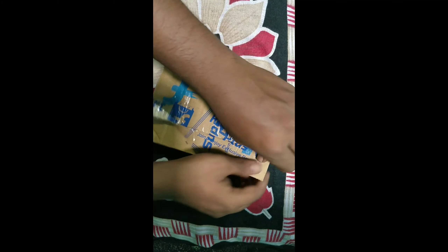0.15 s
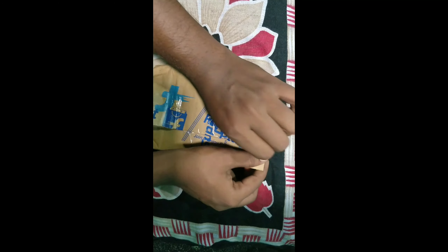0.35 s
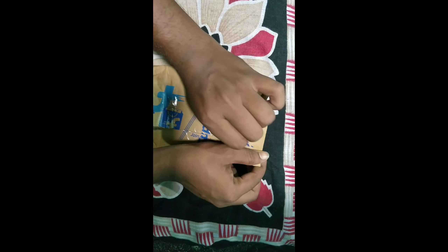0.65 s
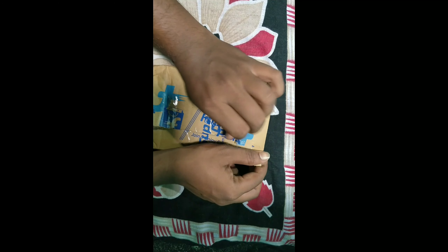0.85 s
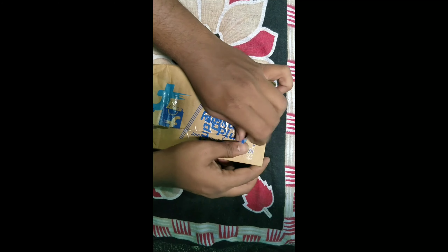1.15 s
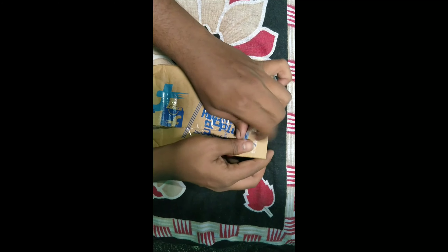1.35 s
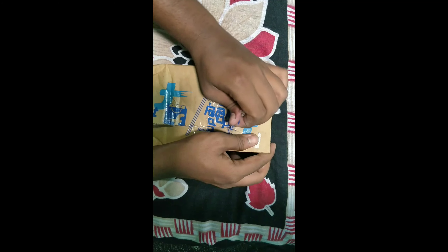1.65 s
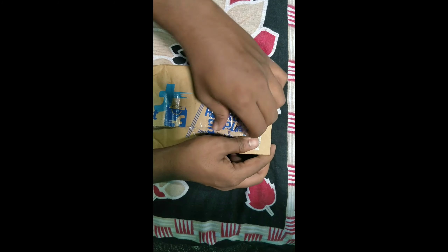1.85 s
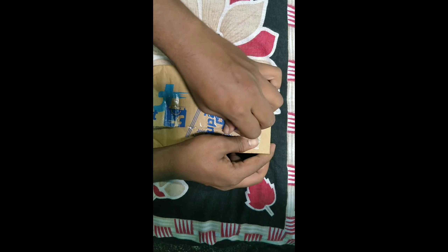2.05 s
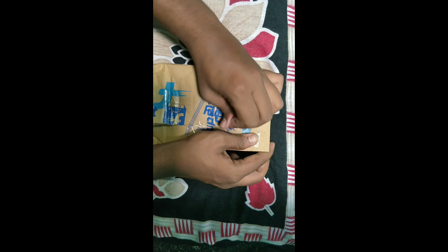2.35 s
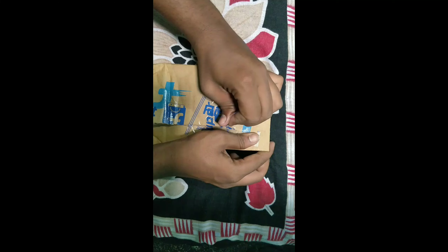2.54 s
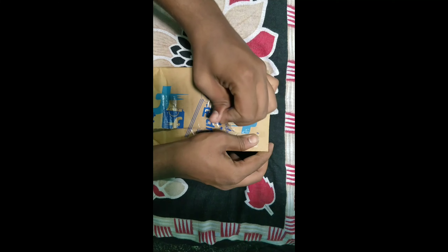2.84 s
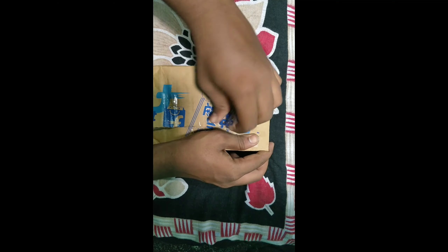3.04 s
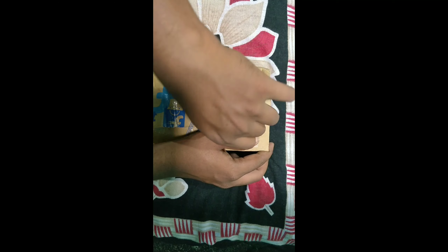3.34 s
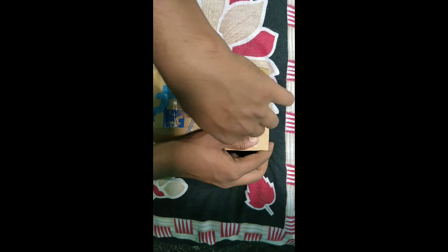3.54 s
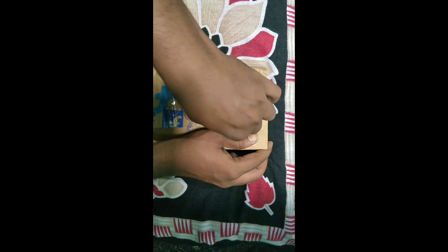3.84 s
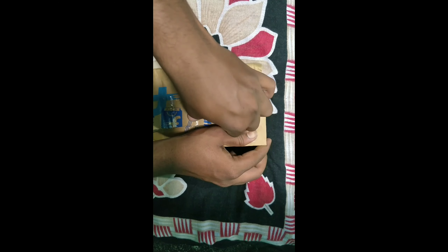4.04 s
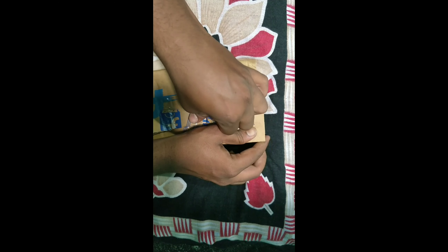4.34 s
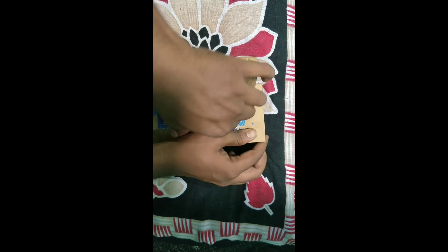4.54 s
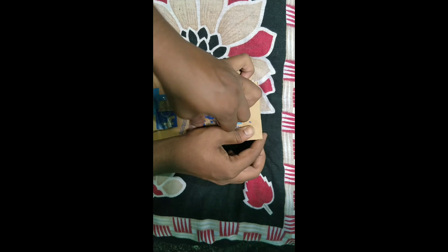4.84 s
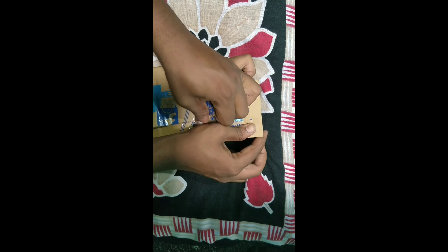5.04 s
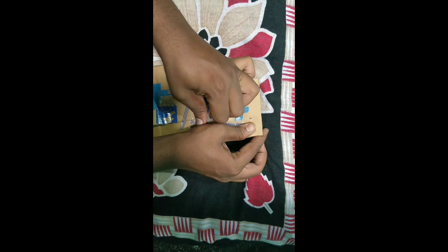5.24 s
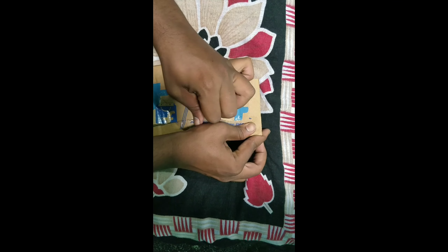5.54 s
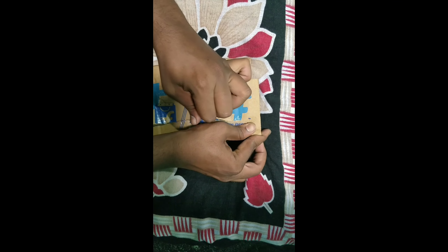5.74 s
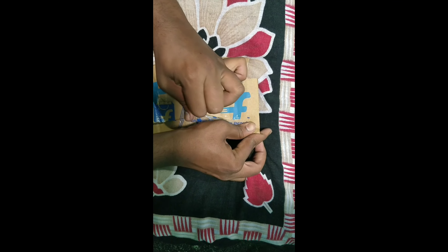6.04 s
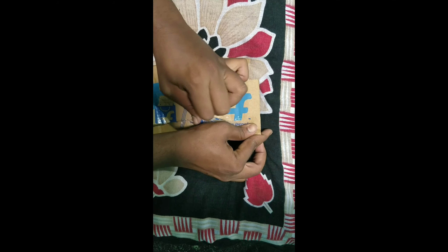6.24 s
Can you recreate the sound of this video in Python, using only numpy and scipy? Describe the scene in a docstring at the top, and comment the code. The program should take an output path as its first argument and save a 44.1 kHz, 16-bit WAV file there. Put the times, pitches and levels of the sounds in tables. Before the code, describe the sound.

Close up in a small room, tape is plucked and peeled from cardboard in irregular clicks and crackles, with a brief vehicle-like rumble behind.

```python
"""In a small room, close to a phone's microphone, fingernails pick packing tape off a little cardboard box.
Snaps are jolts that ring loose tape and box panels; crackle and ticks are noise puffs from breaking glue.
Scuffs are gritty noise, bumps short low cycles, squeaks gliding tones; random reflections answer all
but the squeaks. Behind lie steady room tone and a low roar, probably a vehicle outside, coloured by
the room's resonances."""
import sys
import numpy as np
from scipy import signal
from scipy.io import wavfile
from scipy.ndimage import uniform_filter1d

SR = 44100
rng = np.random.default_rng(int(sys.argv[2]) if len(sys.argv) > 2 else 0)


def waveform_to_disk(signal):
    """Save audio, clipped to [-1, 1], as 16-bit WAV at the path in sys.argv[1]."""
    frames = np.transpose(np.atleast_2d(signal))
    scaled = np.clip(frames, -1, 1) * 32767
    samples = np.round(scaled).astype(np.int16)
    wavfile.write(sys.argv[1], SR, samples)


N = 281790  # samples in the scene


def gain_of(db):
    """Decibels to amplitude factor."""
    return 10 ** (np.asarray(db) / 20)


def evened(x):
    """Scaled to an rms of 1."""
    return x / np.sqrt(np.mean(x ** 2) + 1e-20)


def peaked(x):
    """Scaled to a peak of 1."""
    return x / (np.max(abs(x)) + 1e-20)


def unit(x):
    """Scaled to the energy of a short burst whose crest is about 1."""
    return 2.58 * x / (np.linalg.norm(x) + 1e-20)


def smoothed(x, size):
    """Two running means in a row turn fast noise into a slow drift."""
    return uniform_filter1d(uniform_filter1d(x, size=size), size=size)


def read(points, hz):
    """Value of a (frequency, value) curve, interpolated over log frequency."""
    f, value = np.transpose(points)
    return np.interp(np.log(hz + 1), np.log(f + 1), value)


def add(mix, s, sound):
    """Lay a sound into the mix at s seconds, cut at the end of the scene."""
    part = mix[round(s * SR):][:len(sound)]
    part += sound[:len(part)]


def ring(x, hz, width):
    """A fixed resonance of gain about 1; the wider it is (Hz), the sooner it dies."""
    r = np.exp(-np.pi * max(width, 1) / SR)
    return 2 * signal.lfilter([1 - r], [1, -r * np.exp(2j * np.pi * hz / SR)], x).real


def ring_twice(x, hz, width):
    """Two equal resonances in a row: a softer onset and steeper skirts."""
    return ring(ring(x, hz, width), hz, width)


def colour(x, points):
    """Causal minimum-phase filter with the given spectrum: its phase follows from the log gain."""
    hz = abs(np.fft.fftfreq(4096, 1 / SR))
    log_gain = np.log(gain_of(np.maximum(read(points, hz), -100)))
    taps = np.fft.ifft(np.exp(np.conj(signal.hilbert(log_gain)))).real[:2048]
    return signal.oaconvolve(x, taps)[:len(x)]


# The glue lets go or a nail slips off, right at the microphone. Columns:
# start_s, level_db (nominal peak), pitch_hz (ring of the free tape),
# crack_db (bright crack), box_db (box panels), hollow_db (hollow thud), all three relative to level_db
SNAP_EVENTS = [(0.1838, -28.5, 1950, -40, -14, -35), (0.2266, -38, 2880, -4, -36, -28),
               (0.4884, -16.5, 3480, -1.5, -20, -49), (0.7, -9.5, 3300, -2.5, -10.5, -16),
               (0.8196, -33.5, 3140, -9, -33, -34), (0.8732, -30, 1850, -23, -35, -38),
               (0.9, -31.5, 3720, -10, -35, -28), (0.95, -29, 2540, -27, -16.5, -40),
               (0.977, -29.5, 1830, -23, -46, -19), (1.257, -29, 1310, 0.5, -11, -33),
               (1.2813, -28.5, 3120, -24, -3, -20), (1.3351, -32.5, 2580, -16, -29, -28),
               (1.3629, -28, 1450, -16, -10, -33), (1.399, -25, 2180, -27, -10, -17.5),
               (1.477, -31, 2600, -13, -5.5, -30), (1.483, -20, 4140, -22, -24, -26),
               (1.499, -30, 2900, -18, -19, -19), (1.5199, -26.5, 2730, -19, -16, -16),
               (1.5284, -15, 5100, 0, -11.5, -42), (1.5472, -33, 2460, 1, -16, -33),
               (1.601, -21.5, 2900, -11, -43, -47), (1.6573, -32.5, 5670, -15, -29, -21),
               (1.792, -35.5, 3800, -14, -30, -6), (1.8026, -27.5, 1480, -41, -4.5, -8),
               (1.9455, -16.5, 3000, -5.5, -8.5, -8.5), (2.1073, -34.5, 4800, -24, -34, -31),
               (2.201, -32, 5070, -30, -39, -40), (2.325, -28.5, 1570, -14, -34, -23),
               (2.827, -8, 4440, -14, -8, -21), (2.828, -9, 4400, -29, -8.5, -20.5),
               (2.838, -6, 1850, -11, -8.5, -25), (2.8558, -12.5, 5400, -26, -17, -31),
               (2.8628, -14.5, 5400, -16, -33, -42), (2.868, -8, 1880, -28, -34, -32),
               (2.8735, -8, 1910, -20, -26, -35), (3.006, -26.5, 1820, -19, -36, -34),
               (3.0421, -26.5, 4070, -8, -15, -33), (3.111, -32, 1960, -30, -12, -26),
               (3.1451, -35, 3900, -23, -5, -23), (3.2592, -31, 2370, -22, -18, -29),
               (3.365, -12.5, 2090, -37, -8, -14.5), (3.4306, -29, 2680, -4.5, -11, -28),
               (3.511, -35.5, 3600, 4, -4, -3.5), (3.7137, -31.5, 2260, -6, -33, -37),
               (3.7889, -22.5, 2640, -17, -38, -39), (4.049, -32.5, 5100, -10, -39, -30),
               (4.0953, -18.5, 1830, 4.5, 10, -5), (4.2204, -32, 4440, -25, -38.5, -34),
               (4.253, -29, 2840, -29, -30, -33), (4.3415, -26, 2660, -29, -22, -24),
               (4.4973, -23.5, 1520, -38, -6, -3.5), (4.5091, -23, 1700, 2.5, -17, -12),
               (4.515, -27, 4700, -7, -30, -31), (4.6159, -27.5, 4270, -14, -32, -28),
               (4.8553, -19.5, 1840, -29, -11, -26), (5.037, -29, 1260, -6.5, -23, -26),
               (5.1458, -28.5, 3300, -16, -33, -33), (5.4884, -14, 4660, -2, -31, -31.5),
               (5.5766, -38, 5350, 3, -35, -15.5), (5.689, -30.5, 5000, -27, -36, -33),
               (6.1281, -32, 1870, -35, -26, -18), (6.188, -29, 2120, -9, -43, -18)]
# Cardboard panels of the box: pitch_hz (before the grip factor), width_hz, level_db (relative)
BOX_PANELS = [(630, 260, -4), (800, 230, 0), (1180, 400, -9)]
# The grip on the box shifts and its panels tighten or slacken: time_s, pitch_factor
GRIP_SHIFTS = [(0.7, 0.79), (1.28, 0.58), (1.53, 0.89), (1.95, 0.87), (2.83, 0.97), (3.37, 0.85),
               (4.1, 0.88), (4.5, 0.98)]
HOLLOW_HZ, HOLLOW_WIDTH_HZ = 270, 220  # the air inside the box


def snaps():
    """A sharp jolt and a few milliseconds of smaller ones ring the loose tape, crack and shake the box.

    Returns the sound straight at the microphone and the evener one that spreads into the room."""
    near, spread, t = np.zeros(N), np.zeros(N), np.arange(1500) / SR
    treble = signal.butter(2, 4400, "high", fs=SR)
    middle = signal.butter(2, [1400, 4400], "band", fs=SR)
    jolt = signal.unit_impulse(len(t), idx=8)
    push = np.exp(-t / 0.000075)  # the pull on the card is one short shove
    hollow = peaked(ring(push, HOLLOW_HZ, HOLLOW_WIDTH_HZ) * np.minimum(t / 0.00069, 1))
    noises = rng.standard_normal((len(SNAP_EVENTS), len(t)))
    for (s, db, hz, crack_db, box_db, hollow_db), noise in zip(SNAP_EVENTS, noises):
        small_jolts = noise * np.exp(-t / 0.0017) * np.minimum(t / 0.0012, 1)
        grip = np.interp(s, *np.transpose(GRIP_SHIFTS))
        shove = push + small_jolts
        box = peaked(sum(gain_of(panel_db) * ring(shove, panel_hz * grip, panel_width)
                         for panel_hz, panel_width, panel_db in BOX_PANELS))
        thud = gain_of(box_db) * box + gain_of(hollow_db) * hollow
        flap_db = -1.5 + 0.24 * db  # a harder snap shakes more of the loose strip
        width = hz * (0.31 + 0.36 * gain_of(db))  # and rings less purely
        # over all directions the chance colour of the small jolts averages out and the ring is weaker
        paths = ((near, small_jolts + 5.0 * jolt, -4, 1), (spread, jolt, -9, 3))
        for out, drive, ring_db, crack_lift_db in paths:
            tape = gain_of(ring_db) * unit(ring_twice(drive, hz, width))
            flap = gain_of(flap_db) * unit(signal.lfilter(*middle, drive))
            bright = signal.lfilter(*treble, drive)
            film = 1.1 * ring(bright, 5630, 530)  # the film itself rings thinly
            crack = -gain_of(crack_db + crack_lift_db) * unit(bright + film)
            add(out, s, gain_of(db) * (tape + flap + crack + thud))
    return near, spread


# Spells in which the tape is worked or drawn back. Columns:
# start_s, hold_s, level_db (crackle, nominal rms), bright_db (treble relative to level_db)
PULL_SPELLS = [(0.034, 0.034, -66.5, 11), (0.424, 0.45, -63, 2), (0.914, 0.044, -54.5, -4),
               (1.244, 0.43, -58, 1), (1.717, 0.17, -65.5, -6), (2.354, 0.051, -56, 7),
               (2.413, 0.37, -52.5, -7), (2.88, 0.3, -60, 3), (3.424, 0.098, -55, -3),
               (3.63, 0.22, -62, -3), (4.2, 0.048, -51, -14), (4.465, 0.6, -58.5, -9),
               (5.093, 0.16, -55, -11), (5.806, 0.34, -65, 1)]
# Colour of the crackle: pitch_hz, level_db (per Hz)
CRACKLE_COLOUR = [(700, -40), (1100, -18), (1520, -7), (2000, -15), (2400, -4), (2800, -7), (3130, 2),
                  (3450, -6), (3800, -2), (4300, -8), (4900, -10), (5550, -3), (6400, -16), (7500, -12)]
RISE_DB_PER_S, FALL_DB_PER_S = 217.5, 187  # the crackle builds before each spell and dies after it
IDLE_DB, IDLE_BRIGHT_DB = -69, 1.5  # the tape ticks faintly between spells
TICKS_PER_S = 1900  # mean rate in each of two layers
TICK_SPREAD_DB, CLUMP_DB = 2.8, 3.0  # mean of the random tick boost before its cap; rms of the clumping


def crackle():
    """Tiny glue threads break at random, in clumps; a few ticks are much larger than the rest."""
    spells = [(0, N / SR, IDLE_DB, IDLE_BRIGHT_DB)] + PULL_SPELLS
    start, hold, db, bright_db = np.transpose(spells)[:, :, None]
    t = np.arange(N) / SR
    rise_db = RISE_DB_PER_S * np.maximum(start - t, 0)
    fall_db = FALL_DB_PER_S * np.maximum(t - start - hold, 0)
    spells_db = db - rise_db - fall_db
    level = gain_of(spells_db).max(axis=0)  # the loudest spell wins
    top_level = gain_of(spells_db + bright_db).max(axis=0)

    chance, size = rng.random((N, 2)).T, rng.exponential(1, (N, 2)).T
    fuzz, slow = rng.standard_normal(N), rng.standard_normal(N)
    clumps = gain_of(CLUMP_DB * evened(smoothed(slow, 300)))
    breaks = chance < TICKS_PER_S / SR
    pops = gain_of(TICK_SPREAD_DB * np.minimum(size, 4.5)) * breaks
    puffs = signal.oaconvolve(pops, np.hanning(70)[None], axes=1)[:, :N]  # 1.6 ms each
    layers = (puffs[0], puffs.sum(axis=0))
    grain = np.array([evened(colour(fuzz * p * clumps, CRACKLE_COLOUR)) for p in layers])
    # the finest threads add ticks heard only in the treble
    top = signal.lfilter(*signal.butter(2, 4500, "high", fs=SR), grain)
    return level * (grain[0] - top[0]) + top_level * top[1]


# Single glue threads pop, too light to shake the box.
# Columns: start_s, level_db (peak), pitch_hz (ring of the film)
TICK_EVENTS = [(0.049, -37, 1320), (0.098, -44, 4820), (0.6572, -42.5, 4270), (0.919, -49, 5600),
               (0.9305, -38, 1560), (1.1186, -40, 1650), (1.1426, -45, 1480), (1.38, -48, 5440),
               (1.414, -44, 2960), (1.451, -52, 4100), (2.3534, -39, 4540), (2.4258, -35, 3550),
               (2.4364, -38, 3750), (2.449, -34, 3830), (2.4692, -36.5, 3790), (2.4767, -41, 3530),
               (2.484, -44, 3920), (2.4993, -34, 3360), (2.5156, -52, 5000), (2.5388, -39.5, 1520),
               (2.5494, -33.5, 3600), (2.5713, -42, 3830), (2.577, -41, 3320), (2.6137, -31, 2980),
               (2.6298, -40, 3060), (2.654, -39, 3120), (2.677, -34, 2950), (2.7008, -33.5, 3750),
               (2.7034, -35.5, 2500), (2.7527, -47, 3770), (2.769, -40, 3790), (3.0703, -47, 1850),
               (3.2111, -48, 1810), (3.324, -56, 2150), (3.3773, -38, 5560), (3.4371, -34.5, 2240),
               (3.7358, -44, 2330), (3.947, -39, 1340), (4.0224, -38, 1700), (5.0968, -37, 3660),
               (5.1142, -35.5, 2930), (5.119, -36, 2400), (5.1274, -30, 2500), (5.1313, -34, 2890),
               (5.15, -31, 3800), (5.156, -46, 3790), (5.166, -38, 3800), (5.188, -44, 3190),
               (5.196, -34, 2500), (5.2039, -49, 2370), (5.2155, -40, 3060), (5.254, -40, 2930),
               (5.292, -37, 2580), (5.3064, -38.5, 2700), (5.786, -47, 3230), (5.871, -44.5, 4970),
               (6.0232, -45, 1940)]
FILM_HZ, FILM_WIDTH_HZ = 3600, 1800  # broad colour common to all ticks


def ticks():
    """A small jolt and a few milliseconds of fizz ring the thin film only; the box stays still."""
    out, t = np.zeros(N), np.arange(600) / SR
    jolt = 0.63 * signal.unit_impulse(len(t), idx=8)
    for (s, db, hz), fizz in zip(TICK_EVENTS, rng.standard_normal((len(TICK_EVENTS), len(t)))):
        drive = fizz * np.exp(-t / 0.0018) + jolt
        own = unit(ring_twice(drive, hz, 0.45 * hz))
        wide = unit(ring_twice(drive, FILM_HZ, FILM_WIDTH_HZ))
        add(out, s, gain_of(db) * peaked(own + 0.7 * wide))
    return out


# Skin and nails drag over tape and card.
# Columns: start_s, level_db (nominal rms), pitch_hz (centre), length_s (cut at 6000 samples)
SCUFF_EVENTS = [(0.017, -47, 1190, 0.023), (0.038, -46, 970, 0.045), (0.22, -49.5, 1840, 0.019),
                (0.318, -55, 695, 0.06), (0.357, -49.5, 2940, 0.0068), (0.982, -36, 2280, 0.024),
                (1.11, -46.5, 1870, 0.015), (1.228, -51, 3020, 0.0085), (1.27, -44, 2880, 0.017),
                (1.405, -44.5, 2530, 0.02), (1.457, -43, 4040, 0.044), (1.744, -47, 1830, 0.017),
                (1.822, -53, 2460, 0.055), (2.039, -48, 1510, 0.024), (2.124, -49, 3870, 0.0061),
                (2.815, -34, 4470, 0.023), (2.88, -44.5, 1860, 0.083), (3.149, -50.5, 905, 0.044),
                (3.372, -41, 3970, 0.014), (3.469, -50.5, 1240, 0.066), (5.003, -52.5, 5500, 0.0058),
                (5.917, -53, 1680, 0.016), (6.317, -56, 1740, 0.16), (6.341, -55, 640, 0.053)]
ALL_HISS_HZ = 5030  # the higher a drag, the more of it is broad hiss; all of it at this pitch


def scuffs():
    """Short drags: gritty noise that swells and fades, part of it in one soft resonance."""
    out = np.zeros(N)
    band = signal.butter(2, [700, 7500], "band", fs=SR)
    noises = rng.standard_normal((len(SCUFF_EVENTS), 2, 6000))
    for (s, db, hz, length), (fuzz, grit) in zip(SCUFF_EVENTS, noises):
        broad = np.clip(hz / ALL_HISS_HZ, 0, 1) ** 2
        rub = fuzz * gain_of(4.4 * evened(uniform_filter1d(grit, size=90)))
        soft = evened(ring(ring(rub, hz, 0.8 * hz), hz, 4.4 * hz))
        hiss = evened(signal.lfilter(*band, rub))
        drag = ((1 - broad) * soft + broad * hiss)[:round(length * SR)]
        add(out, s, gain_of(db) * drag * signal.windows.tukey(len(drag), .7))
    return out


# A fingertip slips and squeaks on the smooth tape.
# Columns: start_s, level_db (nominal peak), first_hz, last_hz (both before the wobble), length_s
SQUEAK_EVENTS = [(0.228, -38.5, 1520, 1260, 0.02), (0.242, -47, 1360, 1370, 0.024),
                 (1.489, -44, 1470, 1440, 0.0095), (2.974, -40.5, 1710, 1680, 0.007)]


def squeaks():
    """A short gliding tone with a weak overtone, swelling and fading, slightly unsteady."""
    out = np.zeros(N)
    noises = rng.standard_normal((len(SQUEAK_EVENTS), 2000))
    for (s, db, first_hz, last_hz, length), noise in zip(SQUEAK_EVENTS, noises):
        count = round(length * SR)
        wobble = 1 + 0.09 * evened(uniform_filter1d(noise, size=80))[:count]
        hz = np.linspace(first_hz, last_hz, count) * wobble
        turn = 2 * np.pi * np.cumsum(hz) / SR
        tone = np.sin(turn) + 0.057 * np.sin(2 * turn)
        add(out, s, gain_of(db) * tone * np.hanning(count))
    return out


# Fingers press or knock the box: start_s, level_db (peak), pitch_hz
BUMP_EVENTS = [(0.066, -35.5, 324), (0.207, -39.5, 342), (0.335, -40, 313), (1.108, -36, 313),
               (1.747, -35, 383), (3.625, -39.5, 624), (3.659, -44, 296), (5.827, -41.5, 280),
               (5.952, -44.5, 330)]


def bumps():
    """Soft pushes on the cardboard: a couple of low cycles that die at once."""
    out, t = np.zeros(N), np.arange(3000) / SR
    for s, db, hz in BUMP_EVENTS:
        swell = t * np.exp(-t * hz * 2.6)
        add(out, s, gain_of(db) * peaked(np.sin(2 * np.pi * hz * t) * swell))
    return out


# How long the small room rings: pitch_hz, t60_s (time to fall by 60 dB)
ROOM_DECAY = [(150, 0.62), (400, 0.54), (1000, 0.36), (2800, 0.22), (7300, 0.3)]
ROOM_DB, ROOM_DELAY_S = -6.5, 0.0057  # level of the reflections; time about which they fade in


def room(x):
    """Dense random reflections after a short gap, each band dying at its own speed."""
    hz, t, z = signal.stft(rng.standard_normal(SR // 2), SR, nperseg=256)
    decay = gain_of(-60 * t / read(ROOM_DECAY, hz)[:, None])
    tail = signal.istft(z * decay, SR, nperseg=256)[1]
    tail *= np.clip(np.arange(len(tail)) / SR / ROOM_DELAY_S - .5, 0, 1) ** 2
    return signal.fftconvolve(x, tail / np.linalg.norm(tail))[:N]


# Low resonances of the room: pitch_hz, width_hz, lift_db (above the rest)
ROOM_RESONANCES = [(141, 12, 9), (196, 12, 9), (244, 12, 7), (295, 14, 6), (320, 18, 10)]


def air(points, patchy_db):
    """Noise with drifting patches in time and pitch, lifted at the room's low resonances."""
    hz = np.fft.rfftfreq(4096, 1 / SR)
    a, b, patches = rng.standard_normal((N // 1024 + 5, len(hz), 3)).T
    patches = uniform_filter1d(patches, size=24, axis=0)  # over pitch
    patches = evened(uniform_filter1d(patches, size=3, axis=1))  # over time
    modes_db = sum(db / (1 + (2 * (hz - f) / w) ** 2) for f, w, db in ROOM_RESONANCES)
    shape_db = (read(points, hz) + modes_db)[:, None]
    z = (a + 1j * b) * gain_of(shape_db + patchy_db * patches)
    return evened(signal.istft(z, nperseg=4096, noverlap=3072)[1][:N])


# The passing roar, outside: time_s, level_db (nominal rms), upper_db (upper hiss relative to level_db)
ROAR_SWELL = [(3.55, -69, 3), (3.78, -58.5, 2), (3.95, -45, 0), (4.08, -38, -5), (4.2, -44, 2.5),
              (4.4, -43.5, -4.5), (4.501, -33.5, -3), (4.77, -34, -5), (4.85, -39, 1.5), (5.0, -44, 0),
              (5.22, -60.5, -0.5), (5.4, -95, -17)]
# Colour of the roar before the room's resonances: pitch_hz, level_db (per Hz)
ROAR_SPECTRUM = [(24, -48), (85, -20.5), (130, -8.5), (310, -5), (385, -11), (600, -12.5), (1000, -12.5),
                 (1550, -13), (2300, -18), (2600, -25), (4000, -31.5), (6000, -43.5)]


def roar():
    """Broad low noise swells as it comes near, fluttering a little; its upper hiss swells in its own way."""
    s, level_db, upper_db = np.transpose(ROAR_SWELL)
    t, (a, b) = np.arange(N) / SR, rng.standard_normal((N, 2)).T
    low_flutter, upper_flutter = evened(smoothed(a, 1500)), evened(smoothed(b, 1500))
    noise = air(ROAR_SPECTRUM, patchy_db=2.0)
    low = signal.filtfilt(*signal.butter(2, 430, fs=SR), noise)
    level_db = np.interp(t, s, level_db, left=-120, right=-120)
    upper_level_db = level_db + np.interp(t, s, upper_db)
    low_part = gain_of(level_db + 1.4 * low_flutter) * low
    return low_part + gain_of(upper_level_db + 1.77 * upper_flutter) * (noise - low)


# Room tone before the room's resonances: pitch_hz, level_db (per Hz)
HUSH_SPECTRUM = [(12, -48.5), (20, -7), (141, 1), (177, -3), (331, -2.5), (703, -9), (2120, -10),
                 (2930, -18), (5490, -16.5), (8000, -56), (10400, -69)]


def hush():
    """Steady room tone: faint coloured noise, 60 dB below full scale in rms."""
    return gain_of(-60) * air(HUSH_SPECTRUM, patchy_db=1.8)


def scene():
    """Hands on the box, all but the squeaks also reflected, over the roar and the room tone."""
    near, spread = snaps()
    fingers = scuffs() + crackle() + ticks() + bumps()
    reflected = gain_of(ROOM_DB) * room(spread + fingers)
    hands = near + fingers + squeaks() + reflected
    # a small box radiates no deep bass
    hands = signal.lfilter(*signal.butter(2, 130, "high", fs=SR), hands)
    return (hands + roar() + hush())[None]


# The microphone lifts the top a little, then rolls off: pitch_hz, gain_db
MIC_EDGE = [(6300, -1.5), (7300, 1.5), (7800, -2), (8300, -21), (8800, -46.5)]
BAND_LIMIT_HZ, HISS_DB = 8829, -95  # steep cut; rms of the electronic hiss after it


def record(dry):
    """The treble rolls off, then a steep band limit; a trace of hiss lies over all."""
    rolled = colour(dry[0], [(21, 0.021)] + MIC_EDGE)[None]
    limit = signal.firwin(511, BAND_LIMIT_HZ, window=("kaiser", 9), fs=SR)
    cut = signal.oaconvolve(rolled, limit[None], "same")
    return cut + gain_of(HISS_DB) * rng.standard_normal(dry.shape)


dry = scene()
out = record(dry)
waveform_to_disk(out)
```